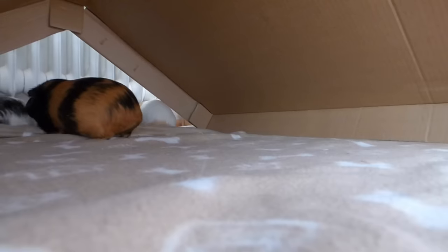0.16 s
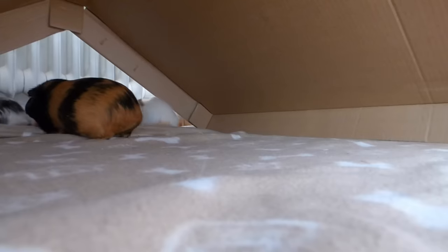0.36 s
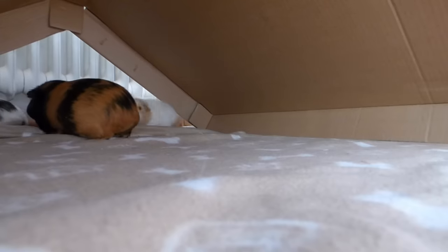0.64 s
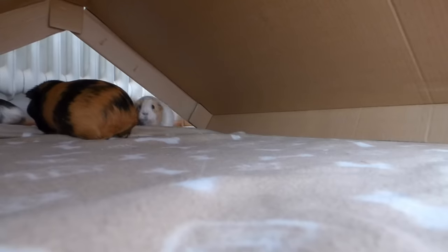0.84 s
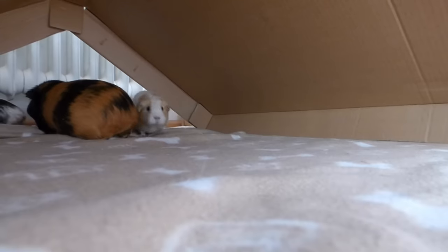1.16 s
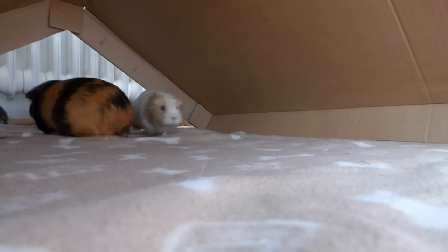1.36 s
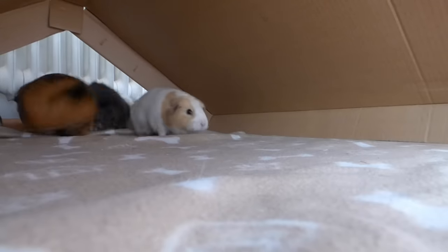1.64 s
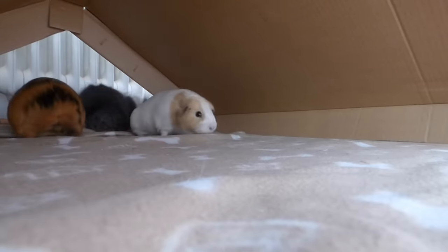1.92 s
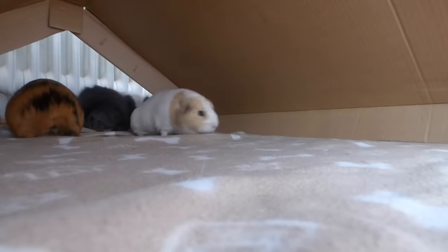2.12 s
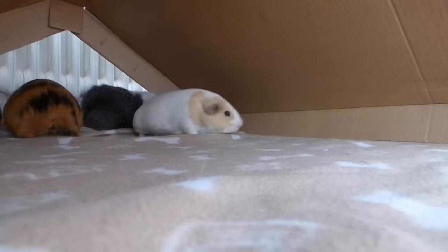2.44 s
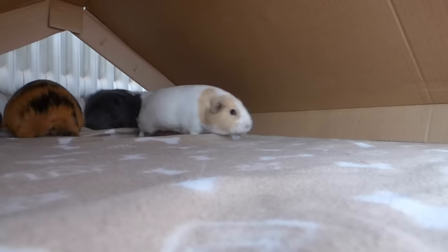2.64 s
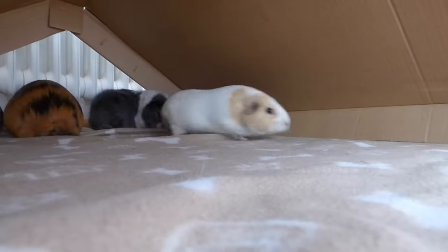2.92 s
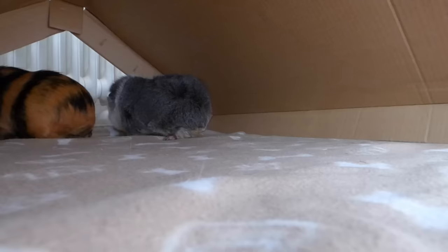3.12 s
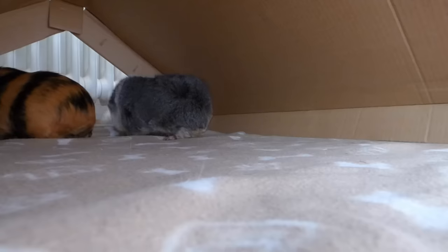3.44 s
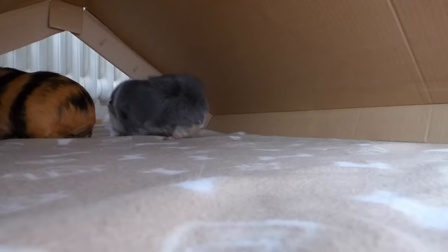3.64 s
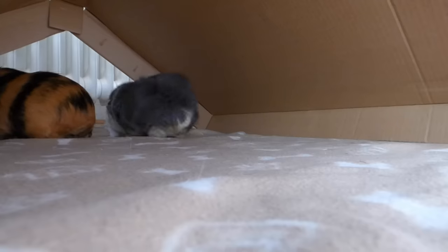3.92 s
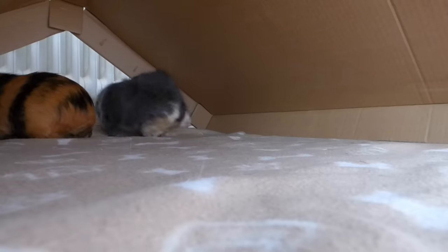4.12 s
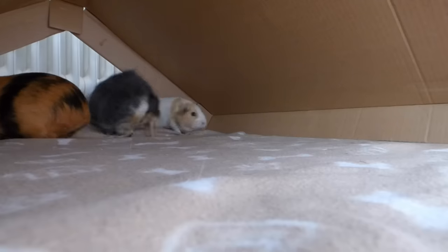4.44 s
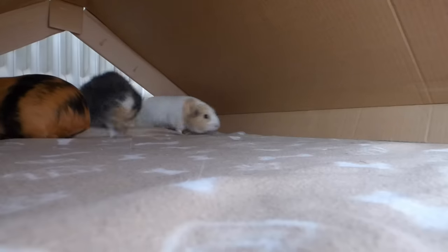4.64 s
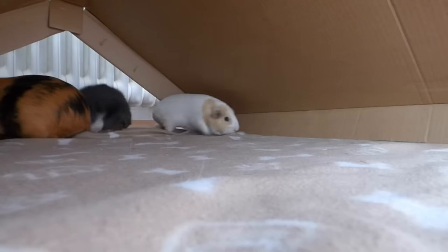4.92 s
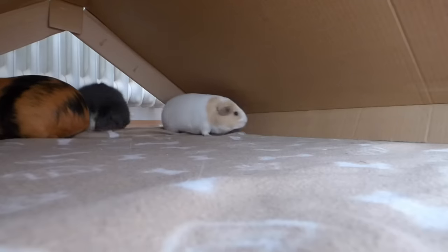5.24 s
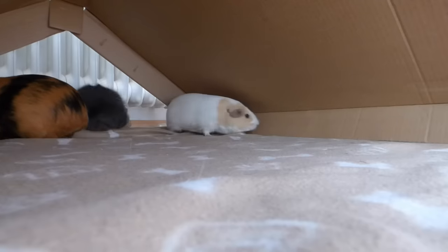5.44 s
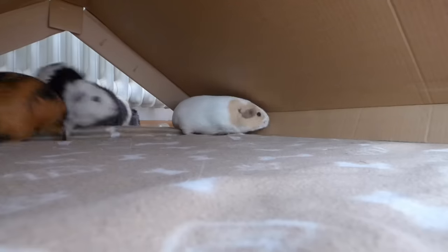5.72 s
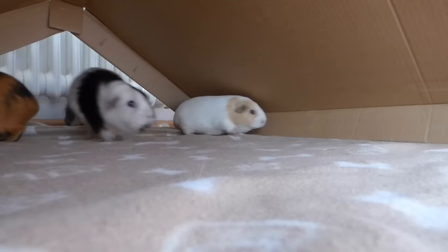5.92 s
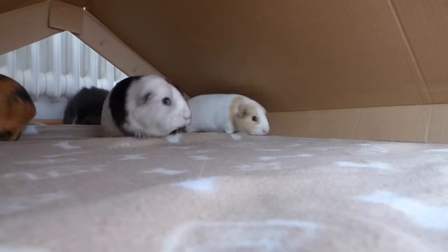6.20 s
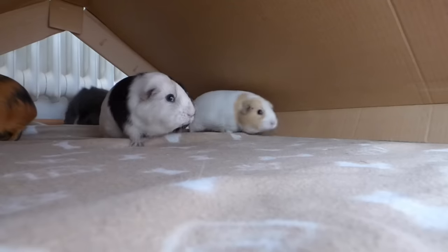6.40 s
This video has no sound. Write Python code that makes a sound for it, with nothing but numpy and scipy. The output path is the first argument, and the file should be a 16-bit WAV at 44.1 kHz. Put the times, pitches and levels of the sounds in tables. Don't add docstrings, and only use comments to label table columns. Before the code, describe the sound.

Low vibrating guinea pig purrs under a hollow cardboard shelter, answered by brief soft chuts, with tiny feet brushing, thudding and clicking on bedding.

```python
import sys
import numpy as np
from scipy import signal
from scipy.io import wavfile
from scipy.ndimage import uniform_filter1d

SR = 44100
rng = np.random.default_rng(int(sys.argv[2]) if len(sys.argv) > 2 else 0)


def master(y):
    cut = np.clip(np.atleast_2d(y).T, -1, 1)
    pcm = np.round(cut * 32767)
    wavfile.write(sys.argv[1], SR, pcm.astype(np.int16))


def amplitude_ratio(level_db):
    exponent = np.asarray(level_db, float) / 20
    return 10 ** exponent


N = 289737

# t/s, level/dB, upper air mode share/dB, length/s
THROBS = [(.024, -20.5, -18, .024), (.08, -22, -5.5, .03), (.152, -23, -3, .024), (.22, -26, -1, .026),
          (.286, -23, -7.5, .024), (.364, -36, -14, .02), (.503, -29, -10, .018), (.594, -26.5, -14, .022),
          (.645, -29, -10, .026), (.849, -33, -18, .016), (.906, -28, -19, .02), (.956, -19.5, -14.5, .026),
          (1.015, -20.5, -7.5, .026), (1.082, -20, -6, .028), (1.15, -21, -4, .027), (1.216, -23, -3, .028),
          (1.283, -21, -6, .025), (1.356, -17, -9, .019), (1.426, -16.5, -16, .019),
          (1.502, -20, -13, .024), (1.583, -23, -13, .027), (1.648, -21.5, -7, .025),
          (1.725, -20, -10, .03), (1.811, -22, -19, .024), (1.89, -23, -16, .024),
          (1.971, -19.5, -19, .023), (2.039, -21, -19, .028), (2.1, -22, -14, .029),
          (2.169, -21.5, -11, .032), (2.236, -23.5, -8, .024), (2.303, -23.5, -6.5, .027),
          (2.378, -20, -9, .027), (2.45, -19.5, -10, .034), (2.542, -18, -17, .037), (2.611, -36, -8, .016)]
# t/s, length/s, level/dB, f/Hz
DEEP_THROBS = [(2.76, 0.009, -30.4, 278), (2.783, 0.01, -38.4, 242), (2.949, 0.012, -30.8, 305),
               (3.203, 0.015, -29.4, 234), (3.263, 0.02, -28.8, 292), (3.326, 0.018, -29.4, 235),
               (3.388, 0.017, -28.1, 236), (3.453, 0.017, -29.7, 239), (3.496, 0.007, -38.7, 239),
               (3.518, 0.018, -26.5, 240), (3.586, 0.018, -24.5, 260), (3.654, 0.018, -26.3, 247),
               (3.719, 0.016, -25.8, 245), (3.786, 0.017, -23.5, 257), (3.853, 0.018, -26.1, 247),
               (3.917, 0.015, -23.6, 257), (3.958, 0.009, -35.1, 261), (3.983, 0.019, -28.4, 237),
               (4.048, 0.023, -28.1, 281), (4.115, 0.013, -27.7, 245), (4.178, 0.013, -27.4, 248),
               (4.245, 0.012, -25.9, 272), (4.287, 0.018, -36.4, 257), (4.313, 0.009, -29.4, 258),
               (4.378, 0.01, -30.5, 282), (4.416, 0.012, -30.5, 278), (4.458, 0.007, -36.6, 257),
               (4.499, 0.023, -30.2, 263), (4.57, 0.011, -36.6, 282)]
# t/s, length/s, level/dB, f/Hz
BROKEN_THROBS = [(4.614, 0.007, -34.1, 251), (4.684, 0.01, -29.0, 255), (4.736, 0.018, -22.4, 263),
                 (4.792, 0.012, -26.3, 253), (4.848, 0.012, -27.8, 253), (4.89, 0.017, -27.2, 279),
                 (4.923, 0.006, -32.8, 270), (4.979, 0.011, -30.0, 288), (5.047, 0.022, -30.7, 302),
                 (5.116, 0.009, -34.7, 294), (5.278, 0.016, -35.2, 289), (5.313, 0.008, -34.6, 304),
                 (5.361, 0.018, -29.1, 270), (5.397, 0.016, -35.4, 248), (5.456, 0.015, -33.6, 252),
                 (5.491, 0.009, -37.4, 260), (5.515, 0.03, -36.2, 239), (5.571, 0.011, -28.8, 256),
                 (5.627, 0.013, -30.4, 237), (5.691, 0.015, -27.1, 261), (5.731, 0.009, -38.2, 223),
                 (5.747, 0.027, -31.0, 264), (5.79, 0.007, -37.3, 264), (5.812, 0.03, -35.5, 268),
                 (5.905, 0.017, -27.6, 251), (5.947, 0.01, -29.5, 237), (5.985, 0.018, -28.0, 263),
                 (6.04, 0.03, -30.3, 314), (6.059, 0.011, -31.1, 274), (6.107, 0.021, -24.3, 260),
                 (6.165, 0.018, -22.5, 260), (6.241, 0.019, -25.2, 253), (6.276, 0.007, -38.2, 245),
                 (6.297, 0.015, -21.3, 259), (6.325, 0.016, -35.7, 225), (6.356, 0.017, -26.2, 233),
                 (6.42, 0.01, -24.2, 259), (6.49, 0.026, -31.3, 242), (6.552, 0.015, -24.5, 243)]
# t/s, level re pitch/dB
DEEP_OVERTONE = [(3.2, -8.5), (4.2, -11), (4.3, -16), (6.57, -21)]
# low/dB, high/dB
OUTSIDE_DB = (-24, -10)
# f/Hz, width/Hz, level/dB
AIR_MODES = [(260, 36, 1.2), (350, 54, .6)]
# f/Hz, width/Hz, level/dB
HIGH_MODE = (700, 26, -5.5)
THROB_PERIOD_S = .068
CATCH_DB, CATCH_SPREAD_DB = -21, 3

# t/s, length/s, level/dB, start f/Hz, end f/Hz
LEFT_CHUTS = [(0.649, 0.007, -26, 847, 915), (0.804, 0.004, -25.5, 830, 943), (0.988, 0.009, -33, 792, 965),
              (1.068, 0.026, -38, 510, 963), (1.278, .012, -32, 700, 795), (1.695, 0.017, -27, 775, 1040),
              (1.757, .007, -27.5, 650, 831), (1.775, 0.0063, -23, 722, 893), (5.094, 0.011, -34, 588, 590),
              (5.178, 0.026, -39, 580, 774), (5.796, 0.021, -27.5, 625, 700),
              (5.825, .017, -27.5, 690, 960), (5.896, 0.023, -27.5, 700, 754),
              (6.057, 0.0015, -20.5, 735, 690), (6.068, 0.016, -27.5, 780, 605),
              (6.098, 0.0031, -25, 765, 794), (6.157, 0.013, -28.5, 584, 740),
              (6.284, 0.012, -29, 690, 730), (6.3, 0.027, -24.5, 725, 800)]
# t/s, overtone level/dB
LEFT_OVERTONES = [(1.8, -9.5), (5.1, -14.5)]
# t/s, length/s, level/dB, start f/Hz, end f/Hz
RIGHT_BLIPS = [(0.36, 0.02, -39.5, 675, 760), (0.474, 0.011, -32.5, 612, 690), (0.5, 0.01, -26, 927, 400),
               (0.588, 0.019, -42, 680, 690), (0.621, .0048, -37, 830, 826),
               (0.783, 0.011, -30.5, 702, 550), (1.65, .008, -33, 670, 813), (2.45, 0.017, -33.5, 658, 850),
               (3.695, 0.0027, -33, 740, 855), (5.98, 0.0057, -31, 534, 1000), (5.964, .004, -31, 900, 520),
               (1.432, .006, -33, 700, 950), (1.585, .006, -37, 750, 1000), (1.993, .004, -36, 700, 850),
               (2.004, .004, -34, 650, 900), (2.014, .004, -37, 700, 850), (1.893, .005, -34, 650, 900),
               (6.045, .012, -33, 560, 620), (5.93, .025, -40, 740, 740), (.065, .035, -44, 710, 710)]
BLIP_OVERTONES_DB = -9
# first t/s, last t/s, length/s, level/dB, f/Hz
ECHO_RUN = (2.103, 2.306, .005, -33.5, 730)
# t/s, length/s, level/dB, start f/Hz, end f/Hz
SQUEAKS = [
    (.013, .018, -39, 1480, 1370),
    (.214, .018, -40, 1330, 1450),
    (.298, .01, -40, 1330, 1450),
    (1.07, .022, -39, 1120, 1180),
]
# multiple, level added to the row's overtone level/dB
CHUT_OVERTONES = [(2, -4.5), (3, -13.5), (4, -25)]

# t/s, length/s, level/dB, f/Hz, hook level/dB
FALLING = [(2.371, .012, -25, 690, -29), (5.273, .012, -29, 680, -27), (3.754, .016, -32, 660, -30),
           (3.476, 0.017, -29.5, 686, -31.5), (4.027, 0.019, -25, 728, -28.5), (4.21, 0.022, -28, 710, -32),
           (4.882, 0.0113, -26.5, 673, -29), (5.052, 0.013, -28.5, 648, -27), (5.357, .012, -26, 648, -27),
           (5.547, .016, -25.5, 719, -36.5), (6.394, 0.012, -25, 670, -23.5),
           (6.487, 0.012, -29.5, 652, -34.5)]
LOWER = [
    (1.257, 0.0094, -29, 625, -46),
    (1.465, 0.018, -28.5, 635, -29.5),
    (1.678, 0.013, -22, 575, -29),
    (3.388, 0.0204, -34.5, 601, -33),
    (3.203, 0.0112, -36, 596, -33),
    (3.948, .011, -32, 615, -26),
    (6.225, 0.017, -27, 613, -29.5),
]
LEVEL = [
    (0.016, 0.043, -31.5, 712, -29.5),
    (0.218, 0.036, -30.5, 706, -30.5),
    (0.296, 0.0317, -28, 712, -25),
]
STRAINED = [
    (4.407, .012, -28, 681, -33),
    (4.499, .012, -30, 663, -36),
    (4.695, .013, -33, 680, -34.5),
    (6.036, .008, -29, 700, -40),
]
STEADY = [
    (2.542, .017, -26.5, 722, -25),
    (2.742, .026, -29.5, 690, -45),
    (2.937, .011, -26.5, 705, -29),
]
# end pitch share, overtone level/dB, hook start f/Hz, hook end f/Hz, hook overtone level/dB, hook lead/s
FALLING_HABIT = (.82, -6.5, 570, 890, -11, 0)
LOWER_HABIT = (.9, -7, 600, 920, -17, 0)
LEVEL_HABIT = (.99, -20, 825, 1450, -31, .002)
STRAINED_HABIT = (.78, -1, 690, 850, -2, 0)
STEADY_HABIT = (.88, -2.5, 640, 830, -5, 0)
PURER_DB_PER_DB, USUAL_DB = 0.21, -20
HOOK_AFTER_S, HOOK_AFTER_SHARE, HOOK_S = .021, 0.26, 0.0068
# from t/s, to t/s
DOUBLED_S = (4.8, 5.4)
# multiple, level/dB
HALF_LINES = [(1.5, -4.5), (2.5, -26)]

# t/s, level/dB, brightest f/Hz
TICKS = [(.523, -24, 6000), (0.849, -29, 8950), (.869, -33, 5200), (3.694, -39, 6200),
         (0.9237, -20.5, 9100), (1.237, -32, 4770), (1.266, -21.5, 8550), (1.3724, -13.5, 4200),
         (2.2736, -25.5, 7450), (2.4091, -22, 8540), (2.841, -31.5, 9800), (3.011, -29, 6800),
         (3.1403, -35, 8310), (3.268, -25.5, 5400), (3.3446, -34.5, 4920), (3.418, -26.5, 5000),
         (3.9741, -19, 4200), (4.5246, -26, 5300), (4.692, -35, 6730), (4.806, -26, 7300),
         (5.271, -27, 8250), (5.3623, -12, 6270), (5.7265, -20, 9300), (6.225, -35.5, 8700)]
# t/s, length/s, level/dB, dull share/dB
STROKES = [(0, 0.66, -54, 6.5), (0.069, 0.087, -37.5, -2), (0.208, 0.14, -42, -0.5),
           (0.411, 0.34, -39, -0.5), (0.583, 0.056, -33, 2.5), (0.645, 0.07, -31.5, 3), (.672, .03, -33, 1),
           (.715, .045, -38, 0), (.76, .06, -50, 0), (0.853, 0.045, -49, 2.5), (0.944, 0.13, -47.5, 4),
           (1.249, 0.061, -47.5, 7), (1.342, 0.14, -49.5, 6.5), (1.616, 0.13, -50.5, 2.5),
           (2.27, 0.016, -41.5, -5), (2.401, 0.022, -44.5, 5.5), (2.442, 0.14, -53, 3),
           (2.736, 0.033, -53, -1), (3.013, 0.039, -50.5, 1), (3.013, 0.1, -63, 13),
           (3.266, 0.0082, -38.5, 1.5), (3.6, 0.044, -46, -1.5), (4.023, 0.081, -52.5, 3),
           (4.137, 0.089, -53, 0), (4.706, 0.051, -39.5, -9.5), (4.806, 0.16, -54.5, 1),
           (5.261, 0.083, -53, 5), (5.348, 0.076, -49.5, 2.5), (5.582, 0.07, -44.5, 5.5),
           (5.686, 0.075, -47, 3.5), (5.917, 0.052, -51.5, 3), (6.111, 0.054, -45.5, -2)]
# f/Hz, level per Hz/dB
FLEECE = [(600, -15.5), (1100, -7.5), (2500, -10.5), (3600, -8.5), (4800, -5), (6500, -5), (9300, -3),
          (11000, -5.5), (14000, -12.5), (16000, -26)]
# t/s, level/dB, f/Hz
THUDS = [(0.504, -30, 162), (5.375, -31, 100), (5.71, -35, 100), (.39, -35, 170), (0.661, -31, 170),
         (0.744, -26, 156), (1.37, -26, 197), (1.69, -25.5, 179), (1.874, -26, 176), (1.943, -25, 126),
         (3.906, -32.5, 100), (4.183, -35, 160), (4.502, -33.5, 117), (4.622, -34, 168),
         (5.334, -29.5, 179), (5.485, -32, 118), (5.741, -31.5, 152), (6.098, -30, 174), (6.348, -35, 187)]
# t/s, level/dB, f/Hz
KNOCKS = [
    (.501, -19.5, 280),
    (1.878, -23, 230),
    (1.945, -23, 190),
    (3.264, -30, 300),
    (5.493, -30, 150),
]
# f/Hz, level per Hz/dB
MURMUR = [(40, -64), (90, -12), (170, 5), (300, 6), (700, -3), (2000, -48)]
# f/Hz, t60/s
ROOM_T60 = [(250, 0.28), (700, 0.12), (2000, 0.12), (8000, 0.072)]
# f/Hz, level per Hz/dB
HISS = [(12, -24), (20, 0), (33, -63), (96, -42), (130, -66), (210, -27), (976, -17.5), (1190, -17),
        (1960, -25.5), (4060, -32.5), (10500, -35), (16000, -35)]
# f/Hz, likeness
HISS_LIKENESS = [(60, 1), (240, 0.13), (950, 0.053), (3770, 0.068), (15000, 0.19)]
HISS_DB, RUMBLE_CUT_HZ, WHINE_HZ, OFFSET = -50, 32, 15625, -.0179


def evened(x):
    return x / np.sqrt(np.mean(x ** 2) + 1e-20)


def read(points, hz):
    f, value = np.transpose(points)
    return np.interp(np.log(hz + 1), np.log(f + 1), value)


def add(mix, s, sound):
    part = mix[..., max(round(s * SR), 0):][..., :sound.shape[-1]]
    part += sound[..., :part.shape[-1]]


def smooth_twice(x, first, second, axis=-1):
    return uniform_filter1d(uniform_filter1d(x, first, axis=0 if axis == 0 else -1), second)


def resonate(x, hz, width):
    turn = np.exp(2j * np.pi * hz * np.arange(len(x)) / SR)
    r = np.exp(-np.pi * width / SR)
    return 2 * (turn * signal.lfilter([1 - r], [1, -r], x / turn)).real


def noise(field_db, patchy_db, same, size=(12, 5)):
    frames, hz = N // 128 + 5, np.fft.rfftfreq(512, 1 / SR)
    a, b, c, d, patches = rng.standard_normal((frames, 257, 5)).T
    patches = evened(smooth_twice(patches, *size, axis=0))
    same = np.clip(same(hz), -1, 1)[:, None]
    left, other = a + 1j * b, c + 1j * d
    z = np.array([left, same * left + np.sqrt(1 - same ** 2) * other])
    z *= amplitude_ratio(field_db(hz[:, None], np.arange(frames) * 128 / SR) + patchy_db * patches)
    return signal.istft(z, nperseg=512, noverlap=384)[1][:, :N]


def throb(start_hz, end_hz, length, lean, flat, multiple=1):
    u = np.arange(round(length * SR)) / round(length * SR)
    pitch_hz = start_hz + (end_hz - start_hz) * np.sin(2.14 * u)
    turns = np.cumsum(pitch_hz) / SR
    swell = np.sin(np.pi * u ** lean) ** flat
    return swell * np.sin(2 * np.pi * (multiple * turns + rng.random()))


def rumble():
    low, high, deep = np.zeros((3, N))
    for s, db, upper_db, length in THROBS:
        end_hz = 345.5 + 2.4 * (upper_db + 8.5)
        voice = amplitude_ratio(db) * throb(228.0, end_hz, .94 * length, lean=0.36, flat=0.62)
        catch_db = CATCH_DB + CATCH_SPREAD_DB * rng.standard_normal()
        catch = throb(610 * rng.uniform(.8, 1.2), 1100, 0.0083, lean=0.34, flat=1.1)
        add(deep, s, amplitude_ratio(db + catch_db) * catch)
        add(low, s - .003, voice)
        add(high, s - .003, amplitude_ratio(upper_db + 4.0) * voice)
    for s, length, db, hz in [*DEEP_THROBS, *BROKEN_THROBS]:
        voice, overtone = (throb(0.92 * hz, 1.02 * hz, 1.35 * length, lean=0.75, flat=.95, multiple=k)
                           for k in (1, 2))
        overtone_db = np.interp(s, *np.transpose(DEEP_OVERTONE))
        add(deep, s - .16 * length, amplitude_ratio(db + 0.6) * (voice + amplitude_ratio(overtone_db) * overtone))
    drives = low + amplitude_ratio(OUTSIDE_DB[0]) * deep, -high - amplitude_ratio(OUTSIDE_DB[1]) * deep
    ring = sum(amplitude_ratio(db) * resonate(x, hz, width) for x, (hz, width, db) in zip(drives, AIR_MODES))
    return amplitude_ratio(-17) * (low + high) + deep + amplitude_ratio(3.5) * ring


def callers():
    first, last, length, db, hz = ECHO_RUN
    times = np.linspace(first, last, round((last - first) / THROB_PERIOD_S) + 1)
    run = [(s, length, db, hz, hz) for s in times]
    left = [(*row, np.interp(row[0], *np.transpose(LEFT_OVERTONES))) for row in LEFT_CHUTS]
    right = hooked(FALLING, FALLING_HABIT) + hooked(STRAINED, STRAINED_HABIT)
    right += hooked(LOWER, LOWER_HABIT) + hooked(LEVEL, LEVEL_HABIT) + hooked(STEADY, STEADY_HABIT)
    right += [(s, length, db + d, k * hz, k * hz * FALLING_HABIT[0], -30)
              for s, length, db, hz, _ in FALLING if DOUBLED_S[0] < s < DOUBLED_S[1]
              for k, d in HALF_LINES]
    right += [(*row, BLIP_OVERTONES_DB) for row in RIGHT_BLIPS + run]
    right += [(*row, -40) for row in SQUEAKS]
    return chuts(left, pan_db=4) + chuts(right, pan_db=-1.7)


def hooked(rows, habit):
    glide, over_db, hook_hz, hook_end_hz, hook_over_db, early = habit
    notes = [(s, length, db, hz, hz * glide, over_db - PURER_DB_PER_DB * (db - USUAL_DB))
             for s, length, db, hz, _ in rows]
    hooks = [(s + HOOK_AFTER_S - early + HOOK_AFTER_SHARE * length, HOOK_S, db, hook_hz, hook_end_hz, hook_over_db)
             for s, length, _, _, db in rows]
    return notes + hooks


def chuts(rows, pan_db):
    out = np.zeros(N)
    ragged = np.tanh(evened(smooth_twice(rng.standard_normal(N), 40, 40)))
    rasp = evened(resonate(resonate(rng.standard_normal(N), 620, 700), 760, 800))
    for s, length, db, start_hz, end_hz, over_db in rows:
        n = round((length + .009) * SR)
        u = np.arange(n) / n
        strain = np.clip((over_db + 21) / 13, .1, 1.2)
        shake = strain * np.resize(ragged[round(s * SR):], n)
        pitch_hz = (start_hz + (end_hz - start_hz) * u) * (1 + .07 * u ** 2 * shake)
        turns = np.cumsum(pitch_hz) / SR
        note = np.sin(2 * np.pi * turns)
        note += sum(amplitude_ratio(over_db + d) * np.sin(2 * np.pi * k * turns + k) for k, d in CHUT_OVERTONES)
        bursts = 1 + np.cos(np.pi * turns)
        note += .42 * strain * u * np.resize(rasp[round(s * SR):], n) * bursts
        attack = np.minimum(u * n / 50, 1)
        release = np.sin(np.pi / 2 * np.minimum((1 - u) * n / 380, 1)) ** 1.5
        note *= attack * release * (1 + .5 * u * shake)
        add(out, s - .0012, amplitude_ratio(db - 0.55) * note)
    lag = round(-pan_db * 1.2)
    return np.array([amplitude_ratio(pan_db / 2) * np.roll(out, lag), amplitude_ratio(-pan_db / 2) * out])


def ticks():
    out, t = np.zeros(N), np.arange(700) / SR
    bounce = 0.16 * np.exp(-((t - .004) / 0.0035) ** 2)
    shape = (1 - np.exp(-t / 0.0007)) * np.exp(-t / 0.0015) + bounce
    for (s, db, hz), grit in zip(TICKS, rng.standard_normal((len(TICKS), 700))):
        crack = evened(resonate(grit, hz, 1200)) + 0.78 * evened(resonate(grit, 6100, 2900))
        crack = signal.lfilter(*signal.butter(2, .33 * hz, "high", fs=SR), crack)
        add(out, s - .0005, amplitude_ratio(db - 6.5) * shape * crack)
    return out * amplitude_ratio(np.array([[1.2], [-1.2]]))


def brushing():
    def field(hz, t):
        dull = 1 / (1 + (hz / 5600) ** 8)
        power = amplitude_ratio(-115)
        for s, length, db, dull_db in STROKES:
            u = (t - s) / length
            onset = 1 / (1 + np.exp(np.clip(-u / 0.039, -50, 50)))
            trail = 1 / (1 + np.exp(np.clip((u - 1) / 0.1, -50, 50)))
            scuff_db = 2.04 * max(dull_db - 5.5, 0) * (hz < 2100)
            power = power + amplitude_ratio(2 * (db + dull * (dull_db - 1) + scuff_db)) * onset * trail
        return read(FLEECE, hz) + 10 * np.log10(power)

    grain = amplitude_ratio(1.13 * evened(uniform_filter1d(rng.exponential(1, N) - 1, 60)))
    strokes = noise(field, 2.2, lambda hz: .85 - hz / 60000, size=(6, 30))
    return amplitude_ratio(-11.5) * strokes * grain * amplitude_ratio(np.array([[.8], [-.8]]))


def footfalls(bustle):
    murmur = noise(lambda hz, t: read(MURMUR, hz) + 0 * t, 3.2, lambda hz: .93 + 0 * hz)
    out = (amplitude_ratio(-54) + amplitude_ratio(-13.5) * bustle) * evened(murmur)
    t = np.arange(6000) / SR
    for (s, db, hz), grit in zip(THUDS, rng.standard_normal((len(THUDS), 6000))):
        push = evened(resonate(resonate(grit, hz, 70), hz, 90))
        push += 0.27 * evened(resonate(grit, 3.34 * hz, 133))
        add(out, s - .005, amplitude_ratio(db - 9.5) * push * t / 0.021 * np.exp(1 - t / 0.024))
    for s, db, hz in KNOCKS:
        sweep = t * (1 + 1.2 * np.exp(-t / .003))
        add(out, s, amplitude_ratio(db) * np.sin(2 * np.pi * hz * sweep) * np.exp(-t / .007))
    return out


def room(x):
    taps = np.zeros((2, SR // 2))
    at = np.arange(200, SR // 2 - 20, 20) + rng.integers(0, 20, (2, (SR // 2 - 201) // 20))
    np.put_along_axis(taps, at, rng.choice([-1., 1.], at.shape), 1)
    hz, t, z = signal.stft(taps, SR, nperseg=256)
    z[1] = np.where(hz[:, None] < 420, z[0], z[1])
    tail = signal.istft(z * amplitude_ratio(-60 * t / read(ROOM_T60, hz)[:, None]), SR, nperseg=256)[1]
    lows = signal.sosfilt(signal.butter(2, 1500, fs=SR, output="sos"), tail[0])
    tail /= np.linalg.norm(lows) * 4
    return signal.fftconvolve(x[None], tail, axes=1)[:, :N]


def scene():
    purr, claws, calls = rumble(), ticks(), callers()
    echo = room(amplitude_ratio(-9) * purr + amplitude_ratio(-4.0) * calls.mean(0) + amplitude_ratio(-5.0) * claws.mean(0))
    hz, width, db = HIGH_MODE
    echo = echo + amplitude_ratio(db) * np.array([resonate(port, hz, width) for port in calls])
    brush = brushing()
    bustle = np.sqrt(abs(uniform_filter1d(purr ** 2 + 3.3 * brush[0] ** 2, 9000)))
    return purr + calls + claws + echo + brush + footfalls(bustle)


def top_cut(x):
    return signal.sosfilt(signal.butter(12, 16310, fs=SR, output="sos"), x)


def record(dry):
    hiss = evened(noise(lambda hz, t: read(HISS, hz) + 0 * t, 1.5, lambda hz: read(HISS_LIKENESS, hz)))
    cut = signal.lfilter(*signal.butter(2, RUMBLE_CUT_HZ, "high", fs=SR), dry)
    dulled = signal.sosfilt(signal.butter(12, 15000, fs=SR, output="sos"), cut + amplitude_ratio(HISS_DB) * hiss)
    whine = amplitude_ratio(-69.5) * np.sin(2 * np.pi * WHINE_HZ * np.arange(N) / SR)
    return top_cut(dulled + whine + OFFSET)


dry = scene()
out = record(dry)
master(out)
```